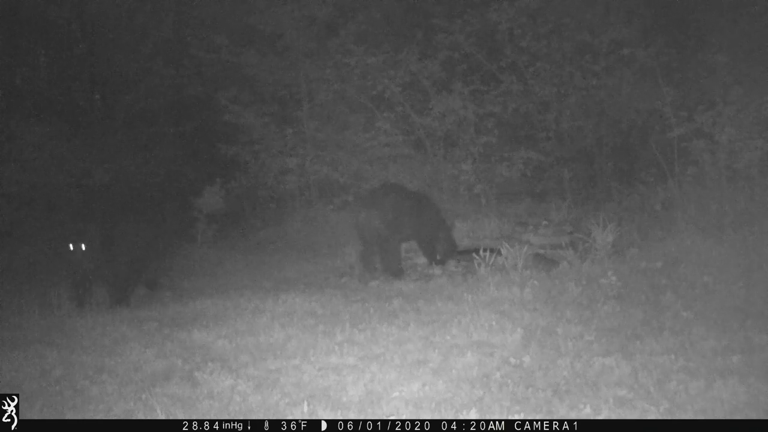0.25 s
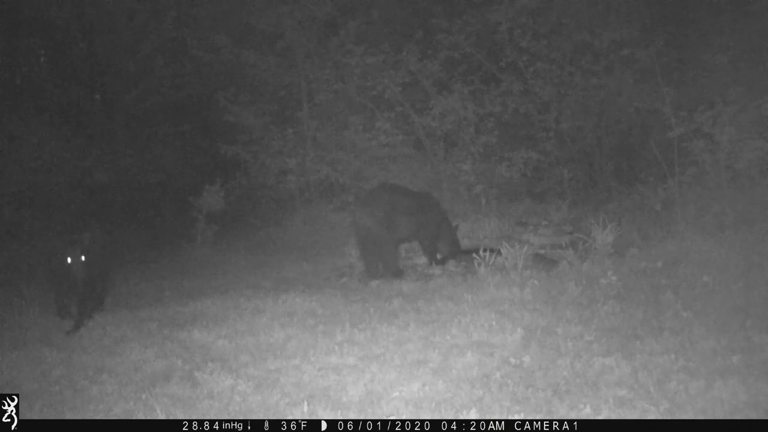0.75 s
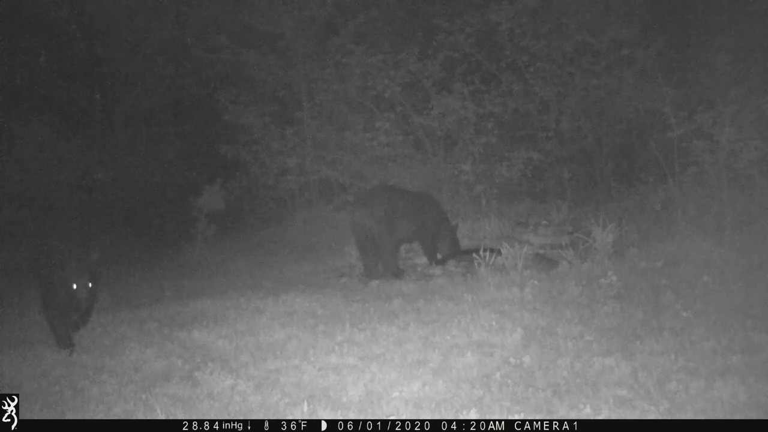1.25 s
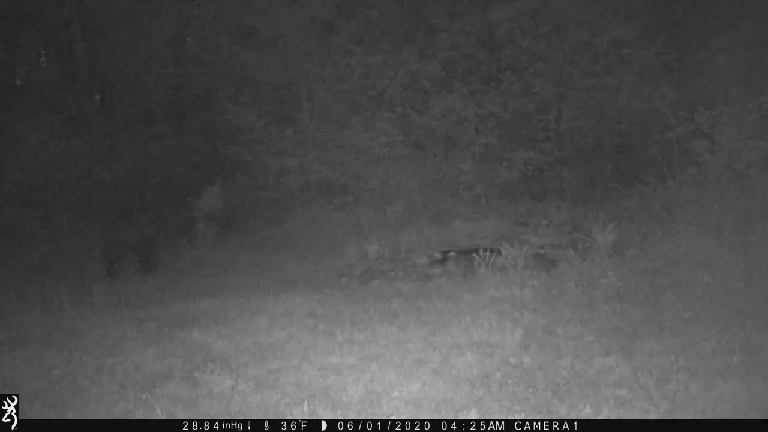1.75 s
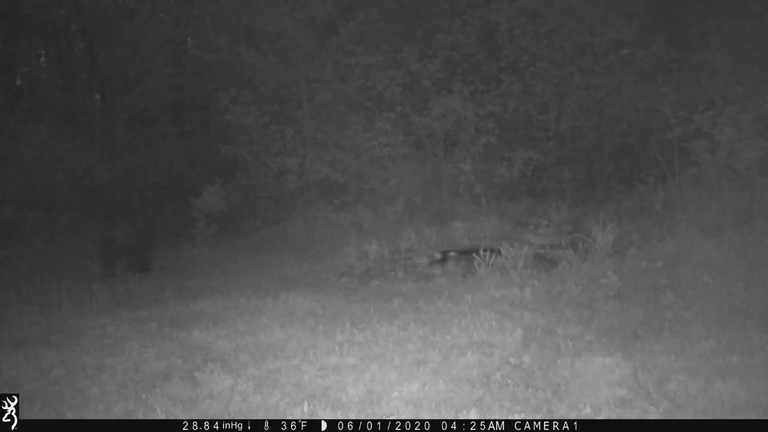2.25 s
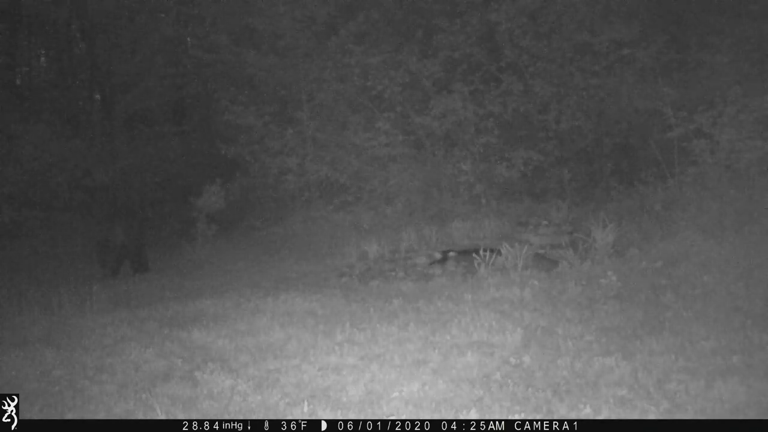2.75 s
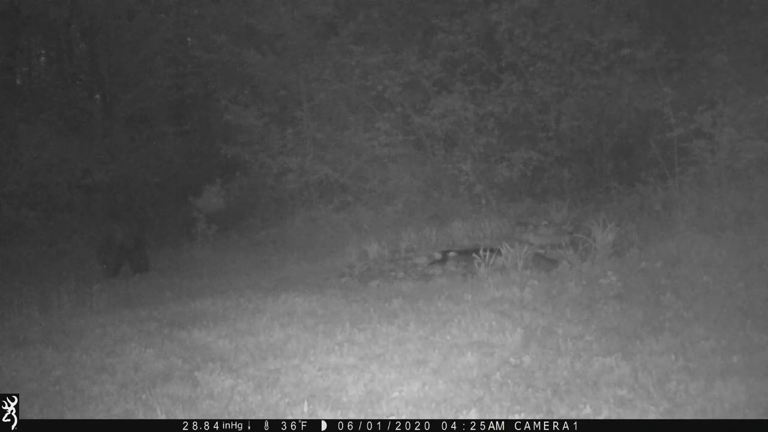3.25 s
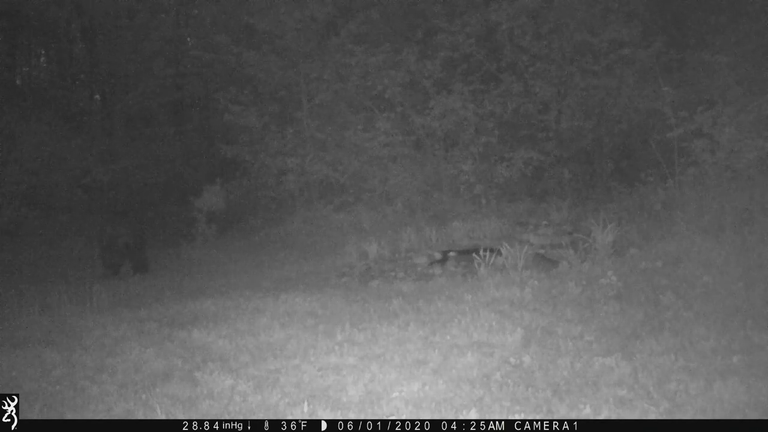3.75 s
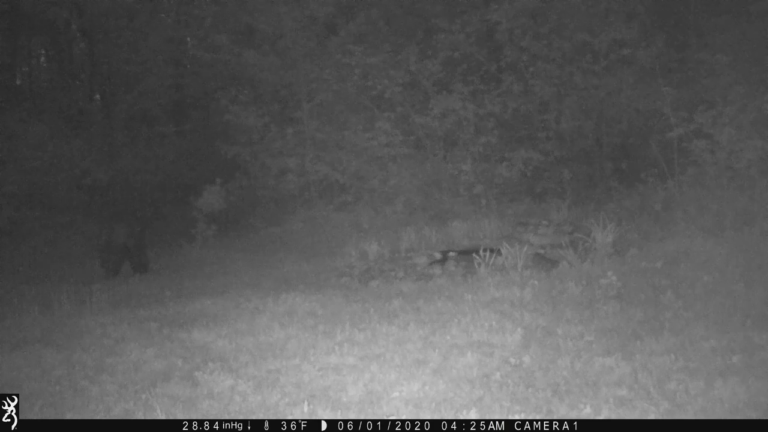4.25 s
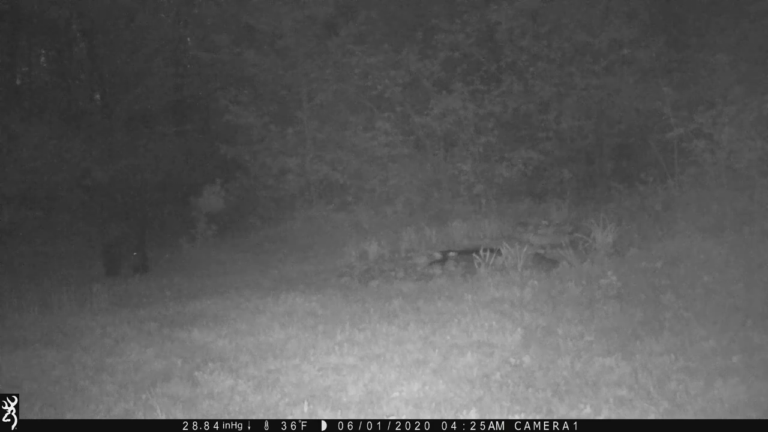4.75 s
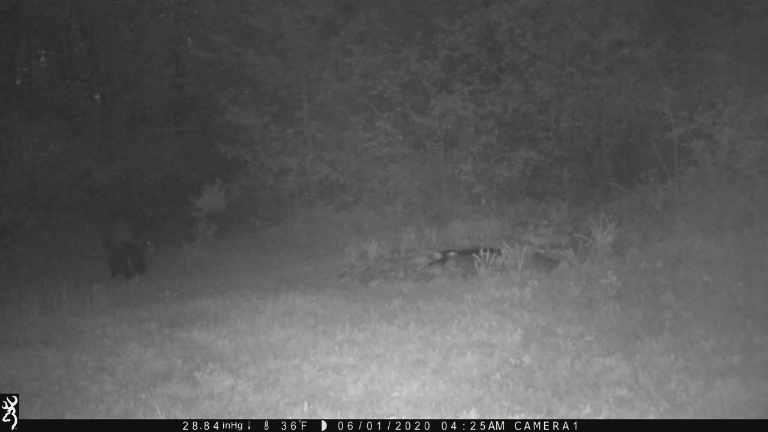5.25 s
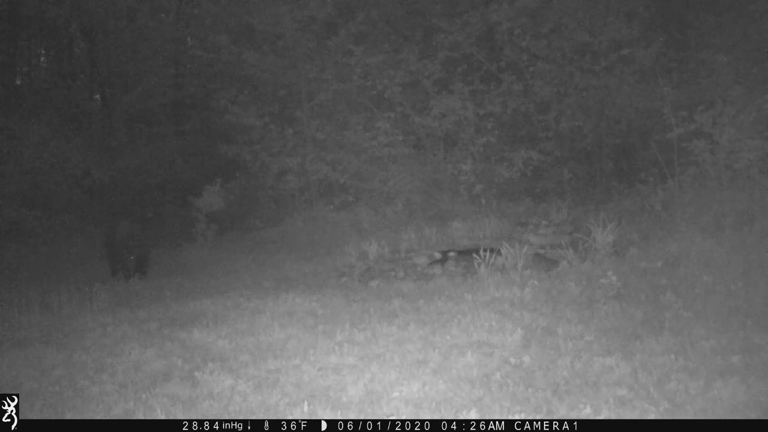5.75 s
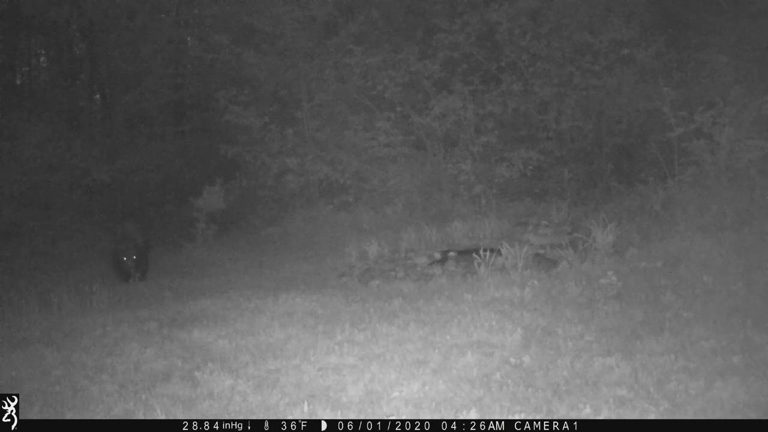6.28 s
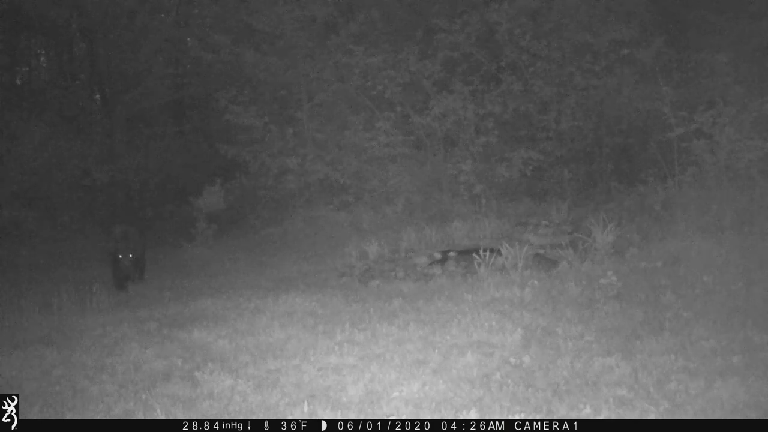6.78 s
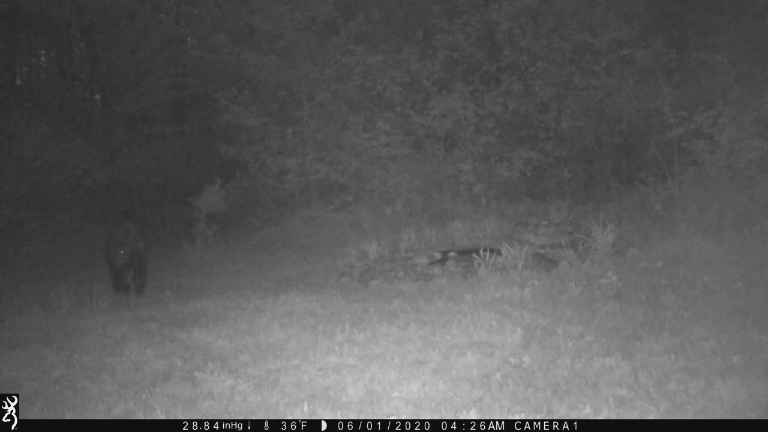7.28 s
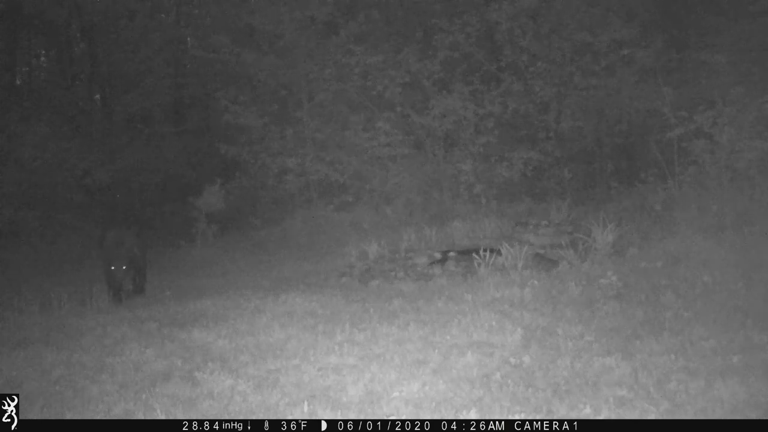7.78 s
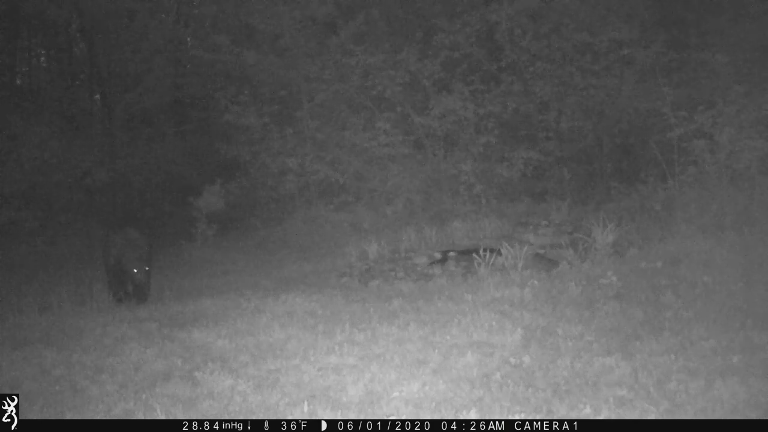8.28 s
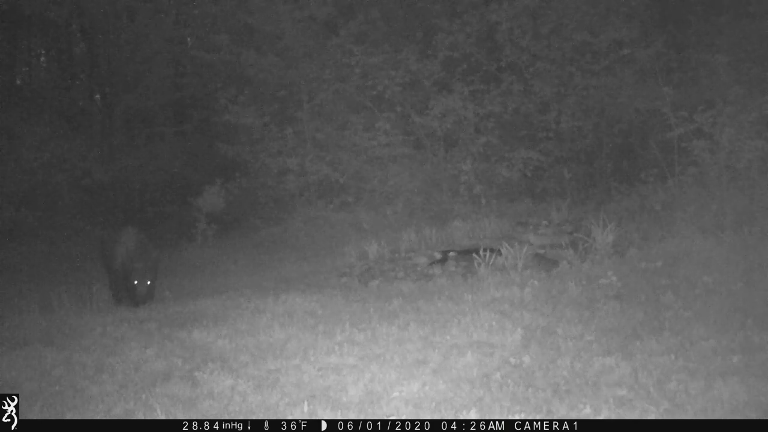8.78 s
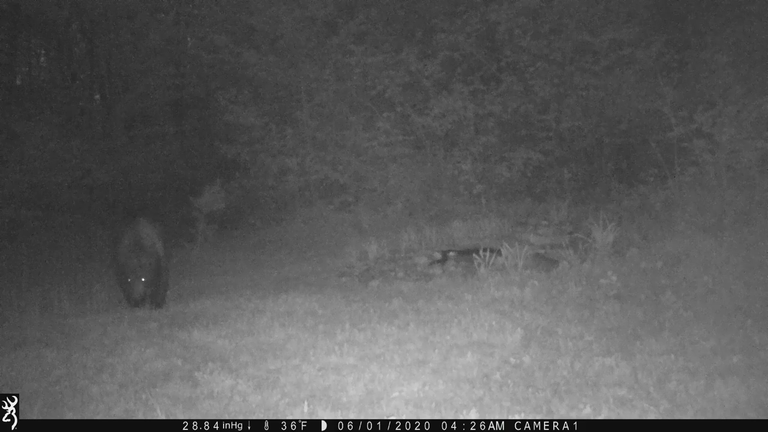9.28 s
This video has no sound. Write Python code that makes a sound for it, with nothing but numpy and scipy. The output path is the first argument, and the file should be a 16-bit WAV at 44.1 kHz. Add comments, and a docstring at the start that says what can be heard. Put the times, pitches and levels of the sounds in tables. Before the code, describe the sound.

A fixed, hissy mono outdoor microphone hears a forest edge at dawn, with a very faint electrical buzz and a reverberant wash of far birds. From 0.1 to 0.45 s small twigs tick while a paw presses softly through grass; around 1.2 s a tighter cluster cracks sharply with a quick rustle. At 1.45 s the sound briefly dulls, and from 1.6 to 1.7 s it nearly vanishes. It returns with a low thump and a rush that dies away. A faint quick twitter runs until about 3.5 s, and a near thrush warbles at 1.9 and 4.6 s, lilts at 3.9 and 7.1, slurs downward at 6.5 and whistles again at 9.3. Soft thuds fall near 2, 2.9 and 3.8 s. A low song repeats about every 0.9 s; thin treetop chips and whistles come and go. Twigs snap at 6.4 and, loudest, 7.35 s. A high see-saw song swells from 9 s.

```python
"""Hiss, a faint buzz and a wash of distant birdsong come first, then snapping twigs and bears in the grass.
Noise makes the hiss, rush, paws and twigs; the buzz is a stack of sines. Every bird is a gliding sine,
and random decaying echoes stand for the forest. A brief dull dip leads to a near-silent gap; the sound
returns with a low thump and a dying rush. A twitterer and a near thrush then join the dawn chorus."""
import sys
import numpy as np
from scipy import signal
from scipy.fft import rfft, irfft, next_fast_len
from scipy.io import wavfile
from scipy.ndimage import map_coordinates

SR = 44100
rng = np.random.default_rng(int(sys.argv[2]) if len(sys.argv) > 2 else 0)


def pcm_store(signal):
    """Save signal as 16-bit PCM."""
    levels = np.round(np.clip(np.atleast_2d(signal), -1, 1) * 32767)
    wavfile.write(sys.argv[1], SR, levels.astype(np.int16).T)


N = 420273  # length in samples

# Relative colour of the steady hiss: (frequency_hz, level_db)
HISS_COLOUR = [(15, -34), (25, 4.5), (79, -3.5), (208, -4), (252, -6.5), (387, -5), (1100, -11),
               (1560, -7.5), (1830, -25), (2460, -9), (2970, -15), (3890, -13.5), (14100, -19),
               (15300, -18.5)]
# Relative colour of the low rush: (frequency_hz, level_db)
RUSH_COLOUR = [(60, 7), (300, -2), (1300, 2), (3000, -1.5), (6000, -14), (12000, -70)]
# Swells of the rush: (crest_s, level_db, rise_s, fall_db_per_s)
RUSH_SWELLS = [(1.7, -41.5, 0.16, 36), (2.92, -48, .1, 20), (3.84, -51.5, 0.17, 25)]
RUSH_FLOOR_DB = -63  # between the swells
# Partials of the electrical buzz: (multiple of the fundamental, level_db)
BUZZ_PARTIALS = [(3, -69), (5, -70.5), (7, -71.5), (9, -76.5)]

# Twigs and dry stalks: (start_s, peak_db, centre_hz, least drop of the splinters in db)
SNAPS = [(.092, -38, 1120, 25), (0.286, -33, 6700, 20), (.415, -28, 7400, 20), (1.184, -34.5, 5280, 25),
         (1.228, -31.5, 1970, 18), (1.255, -22, 6340, 1.5), (1.2558, -31.5, 2070, 3),
         (1.2722, -25.5, 6040, 13), (6.399, -31, 7300, 4), (7.354, -14, 8270, 28)]
SPLINTER_S = .016  # the fibres give way within this time
# Paws in the grass: (centre_s, length_s, thud_db, rustle_db)
STEPS = [(0.436, 0.52, -56.5, -53.5), (1.263, 0.13, -66, -47), (2.046, 0.21, -55.5, -77),
         (2.86, 0.091, -49, -57), (3.803, 0.16, -50, -77)]

# Phrases hold whistled arcs, timed from the phrase start, at levels ahead of the phrase gain and the mix:
# (start_s, length_s, level_db, first_hz, middle_hz, last_hz)
# Each phrase's plural lists when it is sung: (start_s, gain_db)

# Plain far whistles, all sagging alike: (start_s, length_s, level_db, pitch_hz)
WHISTLES = [(0.3, .28, -62.5, 1595), (0.437, 0.22, -61, 2303), (0.716, 0.14, -61.5, 3040),
            (1.207, 0.22, -58.5, 1647), (1.742, 0.031, -49.5, 2390), (1.745, 0.05, -55, 3670),
            (2.425, 0.13, -56, 3480), (3.04, .04, -54, 3390), (3.064, 0.081, -56.5, 5480),
            (3.204, 0.18, -61, 4570), (5.383, 0.082, -53.5, 2860), (5.603, 0.046, -51, 2125),
            (5.73, 0.065, -56, 2790), (6.061, 0.031, -52, 2485), (6.2, 0.038, -56, 2384),
            (6.255, 0.048, -52, 3190), (7.556, .2, -56, 4570), (8.194, 0.071, -54.5, 2403),
            (8.894, 0.033, -48, 2420)]
WHISTLE_SAG = 0.0187  # share of the pitch, above it at the start and below it at the end
# Distant buzzy notes, their pitch shaken into a broad band: (start_s, length_s, level_db, pitch_hz)
RASPS = [(1.278, 0.13, -58.5, 3944), (2.85, 0.063, -50.5, 2250), (7.965, 0.064, -56.5, 2240)]
# Two far, buzzy slurs that cross: (start_s, length_s, level_db, first_hz, middle_hz, last_hz)
CROSSING = [(0, 0.1, -50.5, 1712, 2317, 2630), (.02, .089, -48, 2834, 2000, 1650)]
# When they cross: (start_s, gain_db)
CROSSINGS = [(.71, 0)]
# A low song deep in the wood: (start_s, length_s, level_db, first_hz, middle_hz, last_hz)
CHANT = [(0, 0.0655, -58, 1438, 1651, 1590), (.365, .1, -56.5, 1533, 1746, 2270),
         (.472, .035, -52.5, 2500, 1900, 1620)]
# Its nearly steady repeats: start_s
CHANT_STARTS = [2.382, 3.257, 4.137, 5.017, 5.862, 6.755, 7.655, 8.524]

# A thinner treetop singer, phrase columns and (start_s, gain_db) as above: a chip with steep flanks
CHIP = [(.002, .017, -47, 1920, 3000, 4950), (.021, 0.0096, -38, 4620, 3660, 3420),
        (.034, .033, -38.5, 4000, 3630, 3980), (.066, .014, -44, 4100, 2850, 1700)]
CHIPS = [(2.735, 0), (7.896, 0)]
# Its scoop, same columns
SCOOP = [(0, 0.0551, -39, 3740, 3480, 3780)]
SCOOPS = [(2.925, -0.48), (8.085, 0.62)]
# Its double arch, same columns
ARCHES = [(0, .098, -45, 3820, 4740, 3850), (.12, .17, -55, 4250, 4816, 3650)]
ARCHINGS = [(2.995, -1.3), (8.045, 1)]
# Its stutter that ends in a swoop, same columns
SWOOP = [(0, 0.013, -38, 2160, 3100, 3860), (.018, 0.017, -37, 3660, 3550, 3400),
         (.068, .012, -47, 3300, 3700, 3400), (.08, 0.015, -44.5, 3150, 4100, 3200),
         (.11, .03, -52.5, 4900, 4250, 3680), (.133, 0.0543, -42.5, 3720, 3380, 3300)]
SWOOPS = [(5.596, 0.013)]
# A thin whistle that creeps upward, same columns
CREEP = [(0, .18, -54.5, 3567, 3430, 3634), (.18, .42, -54.5, 3680, 3758, 3842)]
CREEPS = [(3.34, -1.1), (8.42, -0.094)]
# The same thin voice in a run of shorter climbs, same columns
CLIMB = [(0, .17, -51.5, 3310, 3585, 3780), (.215, 0.0844, -49.5, 3340, 3670, 3630),
         (.36, .135, -54.5, 3380, 3580, 3920)]
CLIMBS = [(5.91, 0)]
# A high see-saw song: (start_s, length_s, level_db, first_hz, middle_hz, last_hz)
SEESAW = [(0, .035, -52.5, 6190, 5280, 3960), (.05, .024, -51, 4350, 5080, 5960)]
SEESAW_START_S, SEESAW_EVERY_S = 9.032, .139
SEESAW_FIRST_DB, SEESAW_GROWS_DB, SEESAW_FULL_DB = -3, 3.5, 6  # gain: first, step per repeat, ceiling

# A faint twitterer at a loose pace: average timing, then centre pitch, share swept each way, level before echo
TWITTER_START_S, TWITTER_EVERY_S, TWITTER_NOTE_S = 1.76, .1, 0.055
TWITTER_HZ, TWITTER_SWEEP, TWITTER_DB = 3890, 0.119, -58.5

# The near thrush, phrase columns and (start_s, gain_db) as above: a two-voiced, warbling carol
CAROL = [(0, 0.0384, -49, 3200, 3325, 3650), (.033, 0.0393, -40, 2580, 2890, 2790),
         (.067, 0.0266, -38, 3167, 2956, 3260), (.089, .008, -37, 3190, 2500, 1960),
         (.095, 0.023, -40, 3090, 3060, 3230), (.117, 0.0098, -42.5, 3200, 2350, 2020),
         (.125, 0.033, -47.5, 2000, 1985, 2100), (.125, .036, -42.5, 2884, 2950, 3330),
         (.155, .007, -35.5, 1950, 2300, 2650), (.16, 0.0277, -44.5, 2435, 1970, 2000),
         (.254, 0.0485, -37, 2263, 2480, 2230), (.302, 0.0382, -36.5, 2153, 2436, 2430),
         (.3, 0.032, -49, 3000, 3190, 3430)]
CAROLS = [(1.861, 0.5), (4.62, 0)]
# Its lilt with a faint second voice, same columns
LILT = [(.002, 0.0264, -40.5, 3240, 2620, 2180), (.035, .05, -37.5, 2010, 2475, 2856),
        (.078, .054, -33, 2748, 2558, 2425), (.152, .046, -36.5, 2432, 2754, 2580),
        (.192, .05, -40.5, 2540, 2080, 1900), (.205, 0.0214, -51, 3650, 3290, 3060),
        (.27, 0.08, -36, 2605, 2520, 2482)]
LILTS = [(3.854, 0), (7.064, 0.012)]
# Its long falling slur, same columns
SLUR = [(0, 0.0305, -37.5, 3570, 3230, 3180), (.038, .034, -35.5, 3340, 2940, 2380),
        (.063, 0.0946, -34.5, 2550, 2398, 2390), (.163, .059, -35.5, 2403, 2375, 2230),
        (.228, .035, -36.5, 3052, 2950, 2560)]
SLURS = [(6.492, 0.014)]
# Its short lilt, same columns
SHORT_LILT = [(0, 0.05, -41, 3150, 2300, 2150), (.054, 0.089, -38.5, 2706, 2850, 2600),
              (.111, .062, -37.5, 2702, 2510, 2400)]
SHORT_LILTS = [(9.34, 0.01)]

# The brief drop in level and treble: (start_s, end_s)
DIP = (1.451, 1.505)
# The near-silent break: (start_s, end_s)
GAP = (1.598, 1.702)
TOP_HZ = 15450  # nothing passes from here up


def amp(db):
    """Decibels to gain."""
    return 10 ** (np.asarray(db) / 20)


def unit(x):
    """Scale to rms 1."""
    return x / np.sqrt(np.mean(x ** 2) + 1e-20)


def add(track, s, sound):
    """Mix a sound into a track at time s."""
    start = max(0, round(s * SR))
    part = track[start:start + len(sound)]
    part += sound[:len(part)]


def wobble(rate, size):
    """A smooth random curve, rate knots a second."""
    knots = rng.standard_normal(int(size * rate / SR) + 4)
    return map_coordinates(knots, [np.arange(size) * rate / SR])


def filtered(x, response):
    """Shape the spectrum of x by a gain that depends on frequency."""
    padded = next_fast_len(N + 8192)
    spectrum = rfft(x, padded) * response(np.fft.rfftfreq(padded, 1 / SR))
    return irfft(spectrum, padded)[..., :N]


def noise(colour):
    """Noise of rms 1 with a (frequency_hz, level_db) colour."""
    f, db = np.transpose(colour)
    white = rng.standard_normal(N)
    return unit(filtered(white, lambda hz: amp(np.interp(np.log(hz + 1), np.log(f), db))))


def sing(notes, waver, overtone_db=-50):
    """Each note is a whistle bent through three pitches, slightly unsteady, with a weak octave."""
    song = np.zeros(N)
    tremor = wobble(400, size=N + SR)  # shakes the pitch
    flutter = wobble(90, size=N + SR)  # shakes the level
    for s, length, db, first, middle, last in notes:
        t = np.arange(int(length * SR)) / SR
        now = slice(int(abs(s) * SR), int(abs(s) * SR) + len(t))
        bend = np.polyfit([0, .5, 1], [first, middle, last], 2)
        hz = np.polyval(bend, t / length)
        phase = 2 * np.pi * np.cumsum(hz * (1 + waver * tremor[now])) / SR
        # The attack is a share of the note, the release a fixed 4.4 ms
        edges = np.minimum(t / length / 0.11, (length - t) / 0.0044)
        swell = np.sin(np.pi / 2 * np.clip(edges, 0, 1))
        tone = np.sin(phase) + amp(overtone_db) * np.sin(2 * phase)
        add(song, s, np.sqrt(2) * amp(db + 1.76 * flutter[now]) * swell * tone)
    return song


def repeated(phrase, starts):
    """The notes of a phrase, sung at each start."""
    return [(s + at, length, db + gain, *pitches)
            for s, gain in starts for at, length, db, *pitches in phrase]


def paced(start_s, every_s, count):
    """The starts of a song repeated at an even pace."""
    return start_s + every_s * np.arange(count)


def forest(x, t60, early_db):
    """Trunks scatter a quick cloud of echoes, and the deep wood a long tail."""
    t = np.arange(SR) / SR
    decay = amp(-60 * t / t60) + amp(early_db - 60 * t / 0.046)
    tail = rng.standard_normal(SR) * decay * (1 - np.exp(-t / 0.0063))
    return signal.fftconvolve(x, tail / np.linalg.norm(tail))[:N]


def background():
    """Steady coloured hiss, a low rush that swells and dies away, and a faint electrical buzz of sines."""
    t = np.arange(N) / SR
    buzz_hz = 42.3  # fundamental, itself not sounded
    buzz = sum(np.sqrt(2) * amp(db) * np.sin(2 * np.pi * round(k) * buzz_hz * t) for k, db in BUZZ_PARTIALS)
    swells = [amp(db - fall * np.maximum(t - s, 0)) * np.exp(np.minimum(t - s, 0) / rise)
              for s, db, rise, fall in RUSH_SWELLS]
    rush_level = np.sqrt(amp(RUSH_FLOOR_DB) ** 2 + np.sum(np.square(swells), axis=0))
    return amp(-51.5) * noise(HISS_COLOUR) + rush_level * noise(RUSH_COLOUR) + buzz


def chorus(count=170):
    """Many faint slurs, spread over the whole scene, melt with their echoes into a wash of song."""
    when, span, level, pitch, bend, slide = rng.random((count, 6)).T
    s = (np.arange(count) + when) / count * N / SR
    length = .03 + .06 * span
    hz = 1600 * 2 ** pitch  # anywhere within one octave
    first = hz * (1 + .4 * (bend - .5))
    last = hz * (1 + .4 * (slide - .5))
    song = sing(zip(s, length, -63 + 5 * level, first, hz, last), waver=0.014)
    wash = song / 3 + forest(song, t60=.95, early_db=3)
    return amp(2) * wash


def twigs(count=4):
    """Each snap is a tiny burst in one broad resonance with splinters after it, scattered by undergrowth."""
    track, t = np.zeros(N), np.arange(SR // 20) / SR
    for s, db, hz, below_db in SNAPS:
        decay = 0.12 * amp(-60 * t / 0.0063) + 0.028 * amp(-60 * t / 0.16)
        ping = 2 * np.sin(2 * np.pi * hz * t) * np.exp(-t * hz)
        burst = rng.standard_normal(len(t)) * decay + ping
        band = signal.butter(3, [hz * .65, min(hz * 1.6, SR * .45)], "band", fs=SR, output="sos")
        crack = signal.sosfilt(band, burst)
        crack = amp(db) * crack / np.abs(crack).max()
        add(track, s, crack)
        for k, (late, weak) in enumerate(rng.random((count, 2))):
            splinter = amp(-below_db - 2.3 * weak) * crack
            add(track, s + SPLINTER_S * (k + late) / count, splinter)
    return track + amp(-13.5) * forest(track, t60=0.19, early_db=15)


def paws():
    """Soft weight presses on the ground as low noise; brushed grass is bright noise with a crackly level."""
    t = np.arange(N) / SR
    thud, rustle = np.zeros((2, N))
    for s, length, thud_db, rustle_db in STEPS:
        press = np.exp(-(2 * (t - s) / length) ** 2)
        thud += amp(thud_db) * press
        rustle += amp(rustle_db) * press
    ground = noise([(25, -28), (60, -2.5), (125, 7), (250, -27), (3000, -69.5)])
    bright = noise([(500, 6.5), (3000, 0), (6500, 10.0), (15000, -3)])
    grass = unit(bright * amp(3.9 * wobble(400, size=N)))
    return thud * ground + rustle * grass


def birds():
    """Far, deep-wood and treetop singers whistle, each group with its own balance of direct sound and echo."""
    whistles = [(s, length, db, hz * (1 + WHISTLE_SAG), hz, hz * (1 - WHISTLE_SAG))
                for s, length, db, hz in WHISTLES]
    rasps = [(s, length, db, hz, hz, hz) for s, length, db, hz in RASPS]
    buzzy = rasps + repeated(CROSSING, CROSSINGS)
    far = sing(whistles, waver=0.013) + sing(buzzy, waver=0.0787)
    chant = sing(repeated(CHANT, [(s, 0) for s in CHANT_STARTS]), waver=0.0094)

    treetops = repeated(CHIP, CHIPS) + repeated(SCOOP, SCOOPS)
    treetops += repeated(ARCHES, ARCHINGS) + repeated(SWOOP, SWOOPS)
    high = sing(treetops, waver=0.014, overtone_db=-22.5)
    thin = sing(repeated(CREEP, CREEPS) + repeated(CLIMB, CLIMBS), waver=0.0067)

    # The see-saw grows with each repeat up to its ceiling
    swelling = [(s, min(SEESAW_FIRST_DB + k * SEESAW_GROWS_DB, SEESAW_FULL_DB))
                for k, s in enumerate(paced(SEESAW_START_S, SEESAW_EVERY_S, count=4))]
    seesaw = sing(repeated(SEESAW, swelling), waver=0.013)

    direct = amp(-2.0) * (high + thin) + seesaw + amp(-1.5) * far + amp(-2.0) * chant
    echoes = amp(-2.0) * forest(high + thin, t60=1.0, early_db=8)
    echoes += amp(4.0) * forest(seesaw, t60=0.95, early_db=10)
    echoes += amp(1.5) * forest(far + amp(-7.5) * chant, t60=1.0, early_db=11.5)
    return direct + echoes


def twitter(count=18):
    """Quick high sweeps, alternately rising and falling, with loose timing and pitch."""
    late, pitch = rng.uniform(-1, 1, (count, 2)).T
    starts = paced(TWITTER_START_S, TWITTER_EVERY_S, count=count) + .02 * late
    centres = TWITTER_HZ * (1 + .15 * pitch)
    sweeps = TWITTER_SWEEP * (-1) ** np.arange(count)
    notes = [(s, TWITTER_NOTE_S, TWITTER_DB, hz * (1 - sweep), hz, hz * (1 + sweep))
             for s, hz, sweep in zip(starts, centres, sweeps)]
    song = sing(notes, waver=0.009)
    return song + amp(-1.5) * forest(song, t60=.9, early_db=5)


def thrush():
    """A rough warble and smooth slurs stand clear of their echo; the slur's added octave is only echo."""
    warble = sing(repeated(CAROL, CAROLS), waver=.012, overtone_db=-36)
    slurs = repeated(SLUR, SLURS)
    lilts = repeated(LILT, LILTS) + repeated(SHORT_LILT, SHORT_LILTS)
    smooth = sing(lilts + slurs, waver=.005, overtone_db=-36)
    octave_notes = [(s, length, db, *(2 * hz for hz in pitches)) for s, length, db, *pitches in slurs]
    octave = sing(octave_notes, waver=0.031)
    song = warble + smooth
    echoes = amp(-5.0) * forest(song, t60=1.0, early_db=16.0)
    echoes += amp(-23.0) * forest(octave, t60=0.75, early_db=8)
    return amp(-0.5) * song + echoes


def scene():
    """All sources sum to one signal, sent alike to both channels."""
    mono = background() + chorus() + twigs() + paws() + birds() + twitter() + thrush()
    return np.array([mono, mono])


def record(dry):
    """Level and treble dip briefly, then the sound all but stops and returns with a low thump."""
    t = np.arange(N) / SR
    dip = np.clip((t - DIP[0]) / .008, 0, 1) * np.clip((DIP[1] - t) / .008, 0, 1)
    dull = filtered(dry, lambda hz: amp(-5) / (1 + (hz / 4800) ** 12))
    sound = dry + dip * (dull - dry)

    stop, restart = GAP
    fade_out = np.clip((stop - t) / .008, 0, 1)
    fade_in = np.clip(1 + (t - restart) / .03, 0, 1)  # complete at the restart
    live = fade_out ** 2 + fade_in ** 4 + amp(-45)  # a trace stays in the gap
    # The thump is a one-sided pulse that sinks back to zero
    settling = np.exp(-np.maximum(t - restart, 0) / 0.35)
    thump = amp(-27.5) * np.sin(np.pi / 2 * fade_in) ** 2 * settling
    return filtered(sound * live + thump, lambda hz: hz < TOP_HZ)


dry = scene()
out = record(dry)
pcm_store(out)
```